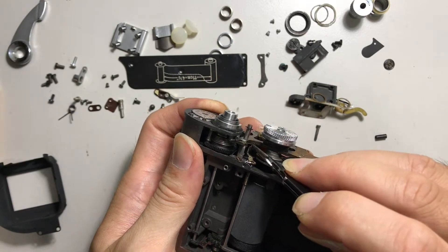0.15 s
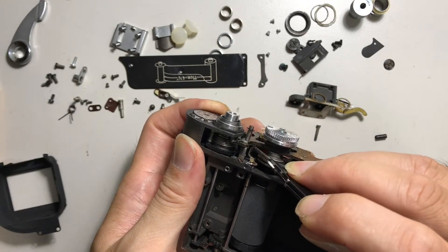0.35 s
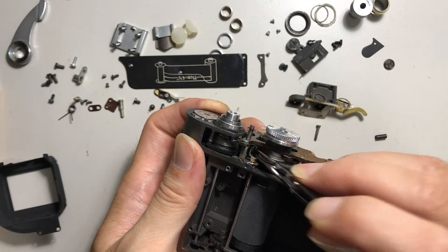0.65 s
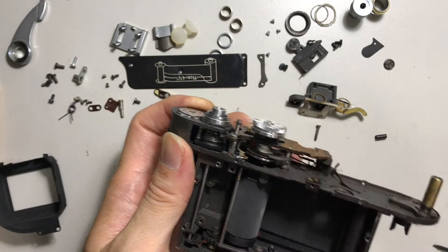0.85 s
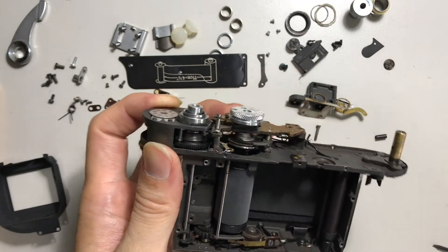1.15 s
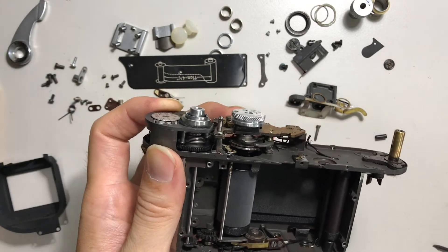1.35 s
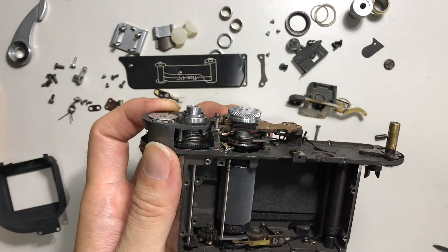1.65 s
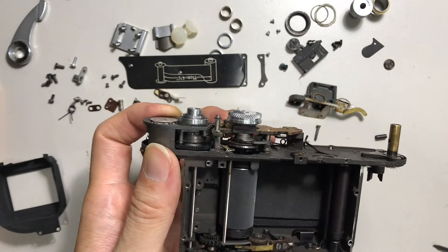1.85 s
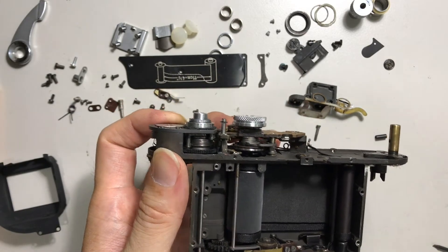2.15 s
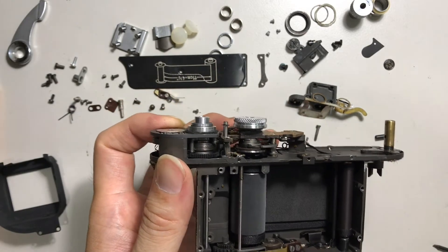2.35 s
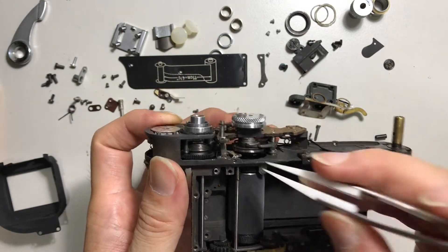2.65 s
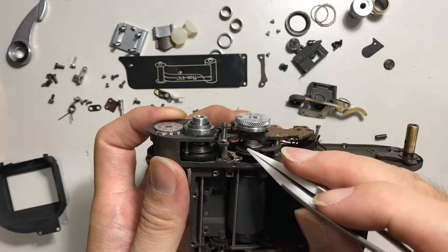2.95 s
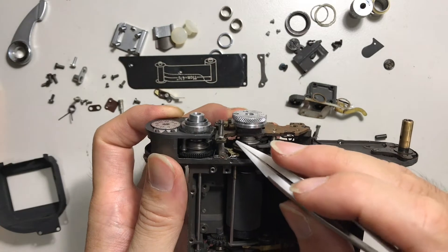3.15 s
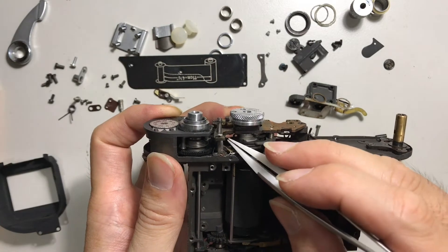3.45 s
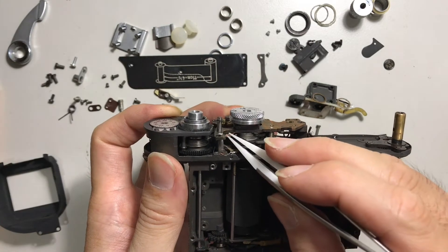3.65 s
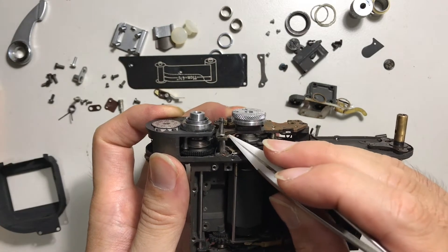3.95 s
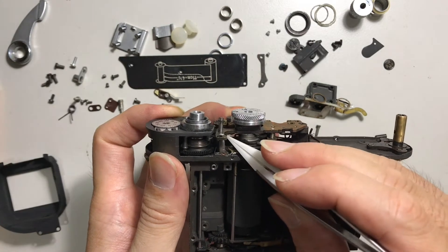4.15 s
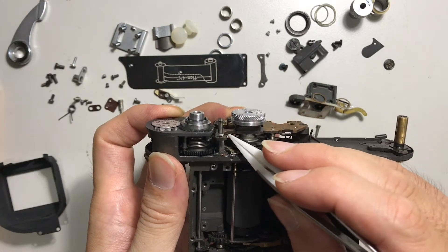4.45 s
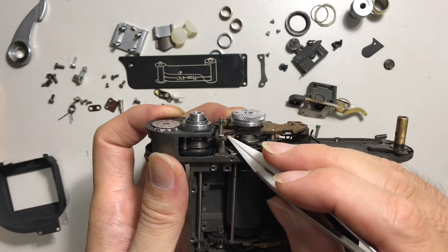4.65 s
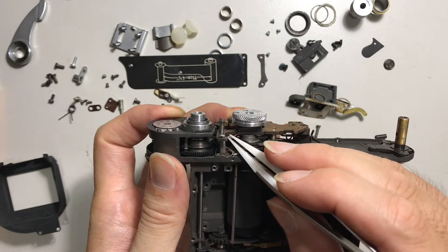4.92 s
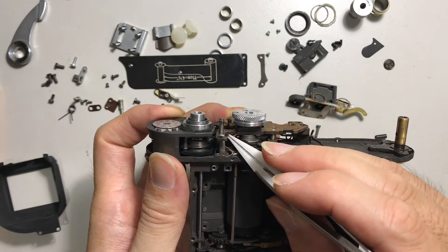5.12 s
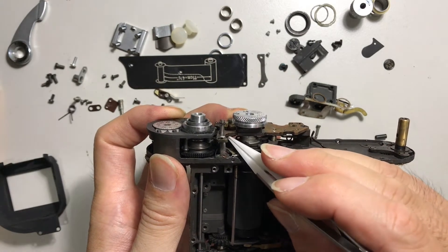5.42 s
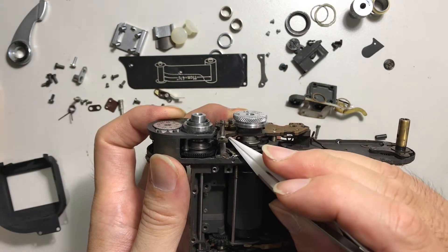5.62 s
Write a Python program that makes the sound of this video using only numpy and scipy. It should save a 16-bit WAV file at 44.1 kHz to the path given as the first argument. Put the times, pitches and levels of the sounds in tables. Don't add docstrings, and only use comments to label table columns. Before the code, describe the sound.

Someone repairs a small camera mechanism on a hard bench, heard close up. Barely audible ticks and a small click cluster lead to the loudest event, a driver clattering down in dozens of rapid steel bounces ending in a woody knock. The hand rustles, steel tweezers clink, then tiny scrapes and damped clicks are spaced widely over steady room rumble and hiss, with a faint room tail.

```python
import sys
import numpy as np
from scipy import signal
from scipy.fft import rfft, irfft, next_fast_len
from scipy.io import wavfile
from scipy.ndimage import uniform_filter1d

SR = 44100
rng = np.random.default_rng(int(sys.argv[2]) if len(sys.argv) > 2 else 0)


def volts_from_decibels(level):
    exponent = np.asarray(level, float) / 20
    return 10 ** exponent


def transcribe(signal):
    frames = np.atleast_2d(signal).T
    limited = np.clip(frames, -1, 1)
    pcm = np.round(limited * 32767).astype(np.int16)
    wavfile.write(sys.argv[1], SR, pcm)


N = 255047
TOP_HZ = 15800


def unit(x):
    return x / np.sqrt(np.mean(x ** 2))


def add(out, start_s, x):
    i = int(start_s * SR)
    out[i:i + len(x)] += x[:N - i]


def fade(t, t60_s):
    return np.exp(-np.log(1000) * t / t60_s)


def band(x, hz, width_hz):
    return signal.lfilter(*signal.iirpeak(min(hz, .45 * SR), hz / width_hz, fs=SR), x)


def between(x, low_hz, high_hz):
    sos = signal.butter(3, [low_hz, min(high_hz, .45 * SR)], "band", fs=SR, output="sos")
    return signal.sosfilt(sos, x)


def walk(rate_hz):
    k = int(SR / rate_hz)
    steps = np.repeat(rng.standard_normal(size=200), k)[:N]
    return uniform_filter1d(uniform_filter1d(steps, k), k)


# freq_hz, density_db [dB per Hz]
AIR_SPECTRUM = [(30, -15.5), (52, 0), (70, -4), (92, -13), (120, -4), (200, -11.5), (245, -3), (330, -4),
                (600, -5), (720, -2.5), (1150, -6.5), (1600, -18.5), (5000, -29.5), (14200, -35),
                (15600, -42.5)]
# time_s, level_db
LOW_SWELL = [(0.0, -70.5), (1.5, -71.5), (1.78, -64.5), (2.43, -71), (2.65, -72), (5.78, -71)]
# time_s, gain_db
RUSTLE = [(0, 2.5), (1.5, 3), (1.9, 7.5), (2.35, 5.5), (2.6, 4)]
# freq_hz, rms_db
HUM = [(59.2, -89.5), (328.4, -84), (10427, -107)]
AIR_DB = -68.5


def air():
    t = np.arange(N) / SR
    size = next_fast_len(N)
    hz = np.maximum(np.fft.rfftfreq(size, 1 / SR), 1)
    shape_hz, shape_db = np.transpose(AIR_SPECTRUM)
    shape = volts_from_decibels(np.interp(np.log(hz), np.log(shape_hz), shape_db))
    noise = volts_from_decibels(AIR_DB) * unit(irfft(rfft(rng.standard_normal(size)) * shape, size)[:N])
    swell_db = np.interp(t, *np.transpose(LOW_SWELL))
    bass_db = 0.62 * walk(2.1) + swell_db - np.median(swell_db) + 0.84
    noise = noise + between(noise, 89.97, 700) * (volts_from_decibels(bass_db) - 1)
    rustle_db = np.interp(t, *np.transpose(RUSTLE))
    noise = noise + between(noise, 1499, 15000) * (volts_from_decibels(rustle_db) - 1)
    out = noise * volts_from_decibels(0.36 * walk(1.706))
    for hz, rms_db in HUM:
        out = out + np.sqrt(2) * volts_from_decibels(rms_db + 2.82 * walk(7.32)) * np.sin(2 * np.pi * hz * t)
    return out


# centre_hz, t60_s, level_db
ROOM = [(124.85, 1.3, -14.5), (249, 1.3, -15), (501.4, 1.8, -14.5), (996, 2.3, -24.5), (2007, 1, -34),
        (3990, 0.72, -28.5), (8000, .6, -34.5), (13020, 0.3, -35)]
BENCH_T60_S, BENCH_DB = 0.078, -13.5


def echo(x):
    t = np.arange(SR) / SR
    bench = rng.standard_normal(SR) * fade(t, BENCH_T60_S) * (t > .002)
    answer = volts_from_decibels(BENCH_DB) * unit(bench)
    for hz, t60_s, level_db in ROOM:
        octave = between(rng.standard_normal(SR), hz / np.sqrt(2), hz * np.sqrt(2))
        tail = unit(octave * fade(t, t60_s) * (t > .008))
        answer = answer + volts_from_decibels(level_db) * np.sqrt(2.1 * hz / SR) * tail
    return signal.fftconvolve(x, answer / np.sqrt(SR))[:N]


# freq_hz, width_hz, level_db
BIT_ON_SCREW = [(5310, 18, -1), (8080, 68, -2), (9300, 40, -8), (11300, 100, -7), (14100, 70, 1),
                (15100, 50, -7)]
PALM = [(1570, 60, 1), (2242, 55, -3), (2740, 70, -1), (3450, 90, -0.5), (4200, 90, -5), (5400, 200, -16)]
TOOL_SLIDE = [(1150, 60, -3), (2200, 22.7, 2.5), (2504, 38.04, 1), (3225, 130, -0.5), (4115, 147, -7),
              (4960, 60, -3), (5357, 150, 2), (5900, 100, -4), (7520, 250, -7), (10580, 200, -7),
              (12600, 200, -8), (13450, 150, -5), (15400, 150, -6)]
TOOL_ROLL = [(2183, 100, -1), (2897, 98, 0), (4670, 120, -2.5), (5290, 120, -5.5), (7000, 150, -9.5),
             (8907, 110, -13.5), (9900, 93, -6.5), (10610, 220, -12.5), (11900, 101, -4), (15600, 93, -1)]
BIT_RUB = [(5215, 100, -2), (8500, 103, -3), (12600, 200, -0.5), (13900, 200, -4)]
TOOL_DRAG = [(2150, 90, 0), (3200, 100, -8), (5350, 90, -2), (7400, 200, -11), (10500, 200, -18),
             (13500, 200, -17)]
TOOL_SKID = [(473, 53, -7), (1230, 340, -1), (1840, 220, -3), (2230, 540, -13), (4000, 110, -31),
             (5760, 84, -11), (6780, 100, -22)]
FINGERS = [(1800, 89, -2), (2240, 54, -2.5), (2770, 55, -2), (3130, 71, -2.5), (3630, 40, -5),
           (4880, 60, -15)]
WRIST = [(680, 50, 0), (980, 25, -2), (1130, 71, -24), (2330, 42, -22)]
BLADES = [(5900, 80, -12), (7600, 45, -9), (10700, 21, -10), (12900, 53, -7), (13300, 28, 0),
          (15500, 96, -13)]
PLATE = [(2020, 32, -20), (2500, 160, -0.5), (6430, 63, -4), (9600, 60, -2), (10400, 60, -5.5)]
TIPS = [(4210, 120, -1), (12400, 100, 1), (13400, 120, -6), (14600, 60, 2), (15400, 100, 2.5)]
LEVER_EDGE = [(2100, 70, 0.5), (3697, 150, -8), (4850, 200, -11), (10580, 130, -24), (13100, 180, -21),
              (15400, 97, -16.5)]
STROKE_STARTS_S = [.722, .918, 1.454, 1.5, 1.586, 1.619, 1.857, 2.015, 2.172, 2.376, 4.006, 4.012, 4.012,
                   4.37, 4.405]
# surface, treble_fade [ratio], rise_s, fall_s, rms_db, hiss_db, rough_db
STROKES = [ (BIT_ON_SCREW, .1, 0.011, 0.055, -68, -12, 2), (PALM, .6, .01, 0.078, -71, 3.3, 2.2),
           (TOOL_SLIDE, 1.4, 0.031, 0.075, -45, 0.5, 1.3), (TOOL_DRAG, .8, .02, .08, -58, -8, 1.3),
           (BIT_RUB, .1, .012, .015, -65, -12, 1.2), (TOOL_ROLL, 1.5, 0.035, 0.15, -33.5, -2, 1.8),
           (TOOL_SKID, .55, 0.0048, 0.021, -33, -24, 1.6), (WRIST, .55, 0.016, 0.051, -63, -15, 2.2),
           (FINGERS, .55, 0.0092, 0.055, -63, -5, 1.8), (BLADES, .1, 0.011, 0.054, -67, -11, 2.2),
           (TIPS, .1, .004, .012, -64, -1, 1.2), (PLATE, .1, 0.023, 0.036, -59.5, -12, 1.1),
           (TIPS, 0.11, 0.032, 0.053, -54, -14.5, .7), (LEVER_EDGE, .1, 0.011, 0.037, -61, -13, .8),
           (LEVER_EDGE, 2.7, 0.02, 0.07, -70.5, -25, 1.2)]
LIFT_S = 0.059


def scrapes():
    out, t = np.zeros(N), np.arange(SR // 4) / SR
    for start_s, stroke in zip(STROKE_STARTS_S, STROKES):
        surface, treble_fade, rise_s, fall_s, rms_db, hiss_db, rough_db = stroke
        push_s = np.cumsum([0, .002, rise_s, fall_s, LIFT_S])
        push_db = np.interp(t, push_s, [-40, -7.5, -0.5, -20.0, -60])
        patches = np.repeat(rng.standard_normal(len(t)), 100)[:len(t)]
        slips = rng.standard_normal(len(t))
        slip_db = np.minimum(rough_db * rng.exponential(size=len(t)), 11) + rough_db * patches
        grit = slips * volts_from_decibels(slip_db)
        tone = 0
        for hz, width_hz, level_db in surface:
            width_hz = 2.5 * abs(width_hz) + 0.039 * hz
            push = volts_from_decibels(level_db + push_db * (0.83 + treble_fade * hz / TOP_HZ))
            tone = tone + push * unit(band(band(grit, hz, width_hz), hz, width_hz))
        tone = tone / np.sqrt(sum(volts_from_decibels(2 * level_db) for _, _, level_db in surface))
        hiss = unit(band(between(grit, .8 * surface[0][0], 1.082 * surface[-1][0]), 3000, 5000))
        hiss = volts_from_decibels(hiss_db + (1.13 + treble_fade / 2) * push_db) * hiss
        add(out, start_s, volts_from_decibels(rms_db) * (tone + hiss))
    return out


def ring(modes, contact_ms, held_s, free_db, scatter_db, detune, crack_db):
    hz, level_db, t60_s = np.transpose(modes)[:, :, None]
    t = np.arange(SR // 12) / SR
    chance = rng.standard_normal((2, len(hz), 1))
    waves = np.sin(2 * np.pi * hz * (1 + detune * chance[0]) * t)
    waves = volts_from_decibels(level_db + scatter_db * chance[1]) * waves
    swell = np.sin(np.pi / 2 * np.clip(t * 1000 / max(contact_ms, .05), 0, 1)) ** 2
    held = fade(np.maximum(t - contact_ms / 1000, 0), max(held_s, .001))
    free = volts_from_decibels(free_db) * fade(t, np.clip(t60_s, .004, .12))
    y = swell * (waves * (held + free)).sum(axis=0)
    crack = rng.standard_normal(len(t)) * swell * held
    y = y / np.abs(y).max() + volts_from_decibels(crack_db) * crack / np.abs(crack).max()
    y = between(y, 1.06 * hz.min(), 0.97 * hz.max())
    return y / np.abs(y).max()


# freq_hz, level_db, t60_s
PAWL = [(2900, -10, .02), (3807, -1, 0.049), (7490, -6, .03), (8450, -11, .03), (15100, 0, .03)]
SCREW = [(2952, -2.5, 0.035), (3777, -13, .031), (7240, -19, .035), (8300, -25, .033), (15300, -23, .041)]
SPRING = [(7750, 0, .04), (10800, -24, .02), (14130, -14, .015), (15500, -1, .03)]
WASHER = [(3610, -6, .01), (4800, -1, .02), (7580, -4, .02), (10560, -9, .02), (15500, 6, .03)]
SHAFT = [(2050, 0, .04), (3060, -21, .015), (5236, -24.5, .015), (8490, -37, .01), (12700, -30, .01)]
HANDLE = [(2490, -18, .02), (3660, -22, .042), (5920, -1, .025), (8400, -21, .039), (9997, -14.5, .025),
          (11300, -22, .054), (12380, -16, 0.047), (12900, -17, .062), (15100, -19, .027)]
TWEEZERS = [(2800, -18, .01), (3310, -5.5, .01), (3830, -12.5, .01), (4890, -7.5, 0.0086),
            (6040, -2.5, 0.076), (6370, -6.5, 0.07), (9200, -9.5, .057), (11670, -12, .036),
            (12180, -4, .055), (12510, -0.5, 0.1), (14000, -15, 0.087), (15200, 7.5, .03)]
CAM = [(3685, -1, .04), (6750, -28, .03), (7840, -22, .04), (11500, -26, .04), (12740, -25, .03),
       (15600, -10.5, .04)]
LEVER = [(1805, 1, .03), (2150, 2.5, 0.036), (2460, -10.5, .02), (8100, -31, .02), (9080, -26, .02),
         (11800, -42, .015), (13050, -32, .012), (15300, -14, .025)]
CATCH = [(3630, -2, .04), (4140, -8, .03), (4634, -2, .04), (4940, 1.5, .05), (5275, -3, .04),
         (9900, -24, .02)]
FERRULE = [(1950, 1, .01), (3002, -4.5, .01), (7054, 0, 0.011), (8483, -8, .01)]
GRIT = [(2470, 1.5, .02), (3270, -4, .02), (4050, -7.5, 0.016), (5154, -5, 0.019), (6920, -10, .015),
        (10500, -13.5, .01)]
KNUCKLE = [(680, 9, 0.026), (1110, -10, .02), (2230, -16, .015)]
BENCH = [(60, -6, .05), (109, -1, .04), (193, 3, .04), (280, -6.5, .03)]
# (start_s, peak_db, contact_ms, free_db, bright_db [dB per octave])
TOUCHES = [ (PAWL, -20, [(.7685, -45, 2.3, 1, -0.3), (.787, -52, 3.3, -21, 6)]),
           (SCREW, -19, [(.7915, -48, 3.7, 4, .1)]), (SPRING, -10, [(.2695, -60, 1.6, -19, 6),
           (1.275, -67, 6, -9, -30), (4.1945, -58.5, 3, -22, -4), (4.699, -69, 3, -19, 5)]),
           (WASHER, -7, [(.84, -63, 1.5, -25, 2), (3.313, -66.5, 4, -19, -6), (4.595, -59, 4, -22, .6)]),
           (SHAFT, -21, [(1.5645, -44, 5, 10, -6.5), (1.569, -46, 6, 6, -6), (1.583, -44.5, 8, -25, -5.5),
           (1.594, -45, 6, -15.5, -0.7), (5.012, -64, 1.5, -19, 6)]),
           (HANDLE, -13, [(1.9705, -40.5, 2.6, -15, 2), (1.9745, -43.5, 1.1, -13, -2),
           (2.012, -63, 2.9, -21.5, 5)]), (TWEEZERS, -18, [(2.4115, -31.5, 2.6, -11.5, -0.5)]),
           (CAM, -21, [(4.197, -55, 5, -24, 6), (4.599, -47.5, 4.9, -15, -1.5)]),
           (LEVER, -29, [(4.3933, -28, 2.9, -27, 1)]), (CATCH, -23, [(4.3955, -40, 2, -22, 2),
           (4.3998, -50.5, 1.3, -17, -14)]), (FERRULE, -12, [(1.449, -48, 1.2, -30, 1)]),
           (GRIT, -7, [(1.4548, -47.5, .4, -20, 3), (1.4648, -38.5, .5, -16.5, 3),
           (1.468, -44.5, .6, -14.5, -0.5), (1.4852, -43.5, 0.5996, -15.5, 1.5),
           (1.488, -43.5, .6, -15.5, 4), (1.4962, -36.5, .7, -14, -5.5), (1.5022, -40.5, .7, -14, -3),
           (1.867, -36, 0.26, -29, 0), (4.013, -55, .6, -20, -8)]),
           (KNUCKLE, -22, [(1.8565, -32, .5, -13, 9), (2.027, -61, 1.4, -8, 1), (2.175, -59, 1.7, -7, -7)]),
           (BENCH, -28, [(1.665, -50, 4, -6, 0.3), (1.86, -50.5, 5, -8, -3)])]


def ticks():
    out = np.zeros(N)
    for part, crack_db, touches in TOUCHES:
        for start_s, peak_db, contact_ms, free_db, bright_db in touches:
            modes = [(hz, level_db + bright_db * np.log2(hz / part[0][0]), t60_s)
                     for hz, level_db, t60_s in part]
            held_s = .0055 + .003 * contact_ms
            tick = ring(modes, contact_ms, held_s, free_db, .3, .001, crack_db)
            add(out, start_s, volts_from_decibels(peak_db) * tick)
    return out


RISE_S = .0007


def bounces(table, thud, steel, singing, free_spans, ring_db, held_s, free_db):
    out, chance = np.zeros(N), rng.standard_normal((len(table), len(singing)))
    for peak_s, peak_db, steel_db in table:
        thump = ring(thud, 0.29, held_s, free_db, 3.24, 0.021, -20)
        ping = ring(steel, 0.21, 0.00657, -17.5, 3.0, 0.0031, -9.5)
        add(out, peak_s - RISE_S, volts_from_decibels(peak_db - 1.0) * (thump + volts_from_decibels(steel_db + ring_db) * ping))
    hit_s, hit_db, _ = np.transpose(table)
    for (hz, level_db, t60_s), (from_s, until_s), scatter in zip(singing, free_spans, chance.T):
        blows = np.zeros(N, complex)
        ungripped = (hit_s > from_s) * (hit_s < until_s)
        blows[(hit_s * SR).astype(int)] = volts_from_decibels(level_db + 0.99 * hit_db + 3.02 * scatter) * ungripped
        decay = np.log(1000) / (max(t60_s, .01) * SR)
        pole = np.exp(2j * np.pi * hz / SR - decay)
        out += signal.lfilter([1], [1, -pole], blows).imag
    return out


# peak_s, peak_db, steel_db
KNOCK = [(1.8304, -39, -21), (1.8332, -43, -26), (1.8358, -41.5, -26), (1.8398, -42, -7),
         (1.8431, -42, -20), (1.8478, -46, -21), (1.8538, -37.5, -27), (1.8582, -21.5, -18),
         (1.8615, -26.5, -9), (1.8651, -28.5, -10), (1.8683, -28.5, -14), (1.8716, -40, -10),
         (1.8743, -40, -11), (1.8776, -49, -14), (1.8815, -50, -17), (1.8866, -39, -22), (1.8911, -46, -17),
         (1.8937, -51, -17), (1.8988, -57, -16), (1.9012, -52, -13), (1.9054, -43, -24), (1.909, -38, -26),
         (1.9126, -44, -17), (1.9161, -56, -21), (1.9192, -58, -14), (1.9218, -39.5, -26),
         (1.9244, -51, -21), (1.929, -50, -21)]
# freq_hz, level_db, t60_s
KNOCK_THUD = [(159, -28, 0.043), (276, -11.5, 0.021), (510, -6, .04), (703, -10, 0.064), (890, -2, 0.026),
              (1223, 2, 0.046), (1837, 0, 0.06), (2010, 0, 0.029), (2200, 0, 0.043), (2400, -17, 0.034),
              (2750, -23, 0.033), (3340, -10, .03), (4070, -9.5, .03)]
KNOCK_RING = [(5800, -1.5, .05), (6820, -9, .05), (8900, -4, 0.099), (10130, -5, .05), (11100, -4, .09),
              (12300, -8, .09), (13500, -12, .03), (14530, -7, .04), (15400, -1.5, .03)]
HANDLE_END = [(1290, -17.5, 0.062), (1890, -21, 0.036), (5880, -19.5, 0.018), (6930, -32, .05),
              (9010, -32.5, 0.07), (10040, -33, .04), (11310, -29, 0.1), (12000, -33, .07),
              (15200, -36, .04)]
# from_s, until_s
HANDLE_END_FREE = [(1.855, 1.89)] + 8 * [(1.855, 1.867)]


def knock():
    return bounces(KNOCK, KNOCK_THUD, KNOCK_RING, HANDLE_END, HANDLE_END_FREE,
                   ring_db=-4, held_s=0.011, free_db=-5)


# peak_s, peak_db, steel_db
CLATTER = [(1.6207, -36.5, -7.5), (1.6252, -31.5, -12), (1.6298, -34.5, -4), (1.6327, -30, -5.5),
           (1.6353, -32, 0.5), (1.6388, -31, -1), (1.6415, -32.5, -1.5), (1.6441, -16, -12),
           (1.6468, -26.5, -6.5), (1.6498, -14.5, -11.5), (1.6539, -23.5, -5), (1.6564, -20, -6.5),
           (1.6591, -19, -11), (1.6635, -21, -13), (1.6667, -7.5, -9), (1.6693, -21, -9),
           (1.6732, -19.5, -6.5), (1.6758, -25.5, -8.5), (1.6788, -10, -9.5), (1.6837, -24.5, -8.5),
           (1.6878, -24.5, -7), (1.6912, -28, -9), (1.6943, -12.5, -20), (1.6976, -22, -13),
           (1.7007, -32, -5), (1.7034, -12, -13), (1.7059, -25.5, -12.5), (1.71, -27, -10),
           (1.7136, -13.5, -14), (1.7169, -22.5, -18), (1.7205, -35, -8.5), (1.7251, -16.5, -23),
           (1.7289, -20, -11), (1.7331, -30.5, -12), (1.7362, -20.5, -15), (1.7409, -20.5, -9),
           (1.7434, -28, -9), (1.7461, -22, -12), (1.7486, -21.5, -13), (1.7536, -27, -19),
           (1.7599, -25, -16), (1.7629, -33, -12), (1.7671, -30, -15.5), (1.7724, -29.5, -15),
           (1.7759, -34.5, -17), (1.7783, -36, -14), (1.7819, -39, -12)]
# freq_hz, level_db, t60_s
CLATTER_THUD = [(494.6, -9, 0.082), (728.5, -14, 0.076), (954, -9, .06), (1124.6, -2.5, .07),
                (1356, -8.5, 0.14), (1812, -15.5, 0.041), (1964, -3.5, 0.077), (2177, -0.5, 0.063),
                (2410, 1, 0.035), (2630, -6.5, .05), (2840, -6, 0.0603), (3090, -12.5, .05),
                (4040, -12.5, 0.052), (4762, -9, .04)]
CLATTER_RING = [(5180, -5, 0.021), (6130, -6.5, .03), (7462, .5, 0.0999), (8030, 0.5, 0.014),
                (8890, -7, .02), (10200, -12, .03), (11200, -14, .02), (12030, -12, .04),
                (12400, -13.5, .03), (13400, -11.5, .03), (14500, -14, 0.0199), (15440, -12, .04)]
SHANK = [(1140, -31, 0.09), (4036, -35.5, 0.08), (4700, -34, 0.07), (7470, -31.5, 0.14),
         (10150, -28, 0.046), (11950, -36.5, .06), (13900, -33, .1), (15450, -35, .05)]
# from_s, until_s
SHANK_FREE = [(1.62, 1.76), (1.62, 1.75), (1.62, 1.71), (1.66, 1.745), (1.628, 1.655), (1.62, 1.682),
              (1.738, 1.75), (1.62, 1.682)]


def rattle():
    return bounces(CLATTER, CLATTER_THUD, CLATTER_RING, SHANK, SHANK_FREE,
                   ring_db=-3, held_s=0.006, free_db=-11.5)


def scene():
    near = scrapes() + ticks() + knock() + rattle()
    return (near + echo(near) + air())[None]


def roll_off(x):
    return signal.sosfilt(signal.butter(12, 16510, fs=SR, output="sos"), x)


def record(dry):
    mix = signal.sosfilt(signal.butter(3, 45, "high", fs=SR, output="sos"), dry)
    mix = signal.sosfilt(signal.ellip(8, .2, 60, TOP_HZ, fs=SR, output="sos"), mix)
    return roll_off(mix)


dry = scene()
out = record(dry)
transcribe(out)
```